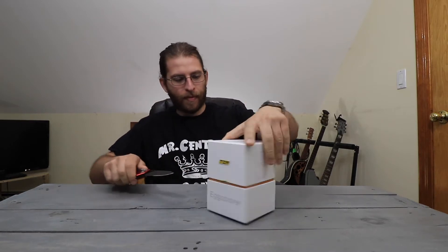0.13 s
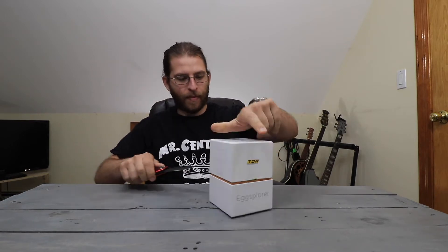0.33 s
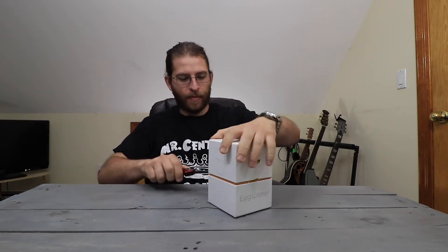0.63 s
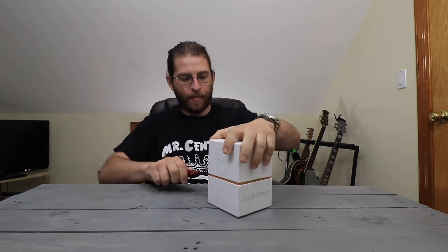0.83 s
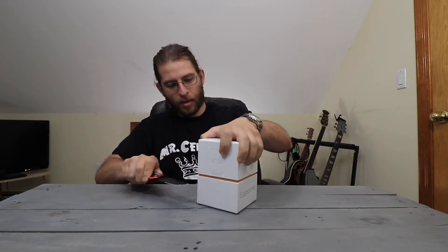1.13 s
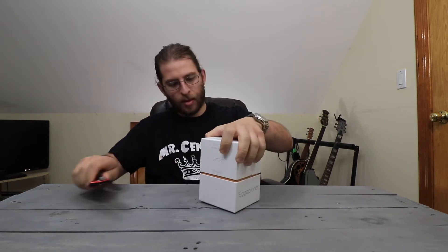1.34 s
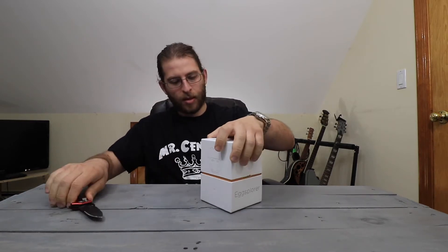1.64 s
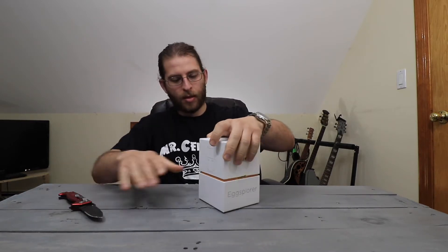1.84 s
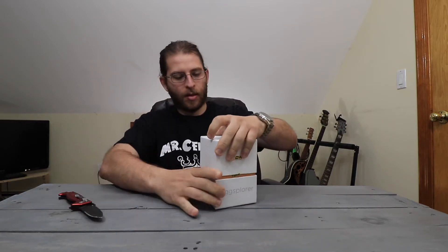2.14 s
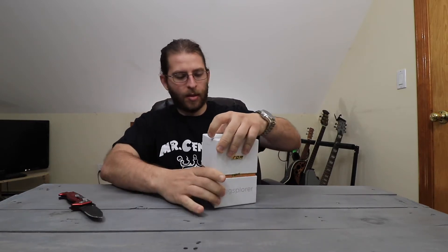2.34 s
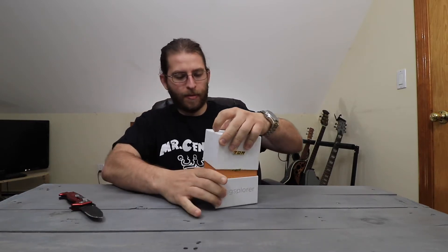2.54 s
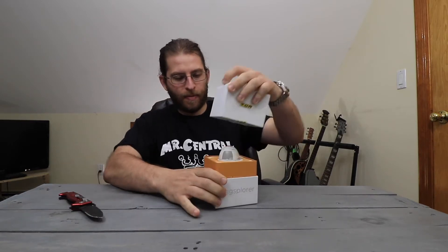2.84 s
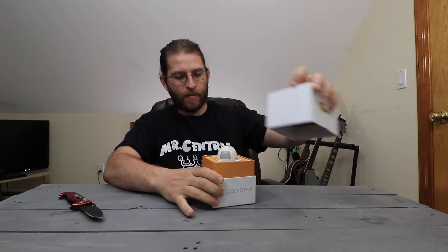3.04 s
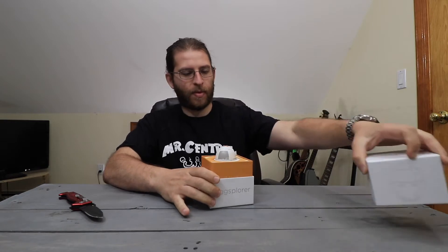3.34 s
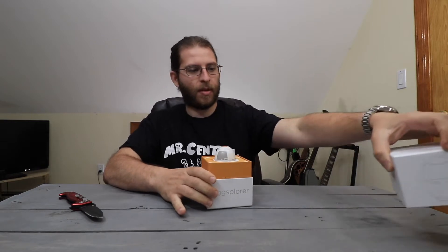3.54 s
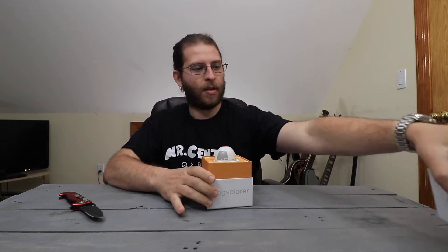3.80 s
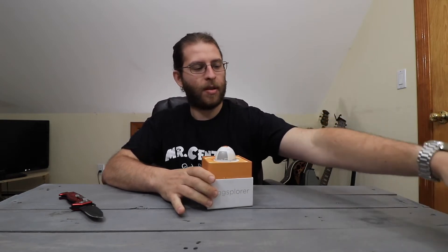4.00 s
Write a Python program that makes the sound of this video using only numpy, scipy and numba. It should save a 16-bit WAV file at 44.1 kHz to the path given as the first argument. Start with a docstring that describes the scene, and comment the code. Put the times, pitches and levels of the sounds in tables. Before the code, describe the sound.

A cardboard box is turned and knocked on a wooden table, a knife clatters down, and the lid slides off with a quick airy whistle.

```python
"""Box opened with a knife

A cardboard box is turned, slit with a knife and opened on a wooden table in a small room; the knife is dropped.
Knocks are damped box tones plus a broad slap, and ring the table modes; ticks are band-limited noise bursts.
The knife is noise contacts through resonances; sliding card is uneven noise in a moving band.
The lid whistles as noise in two climbing resonances. Room tail, rumble and hiss lie below; gain control ducks."""
import sys
import numpy as np
from scipy import signal
from scipy.fft import rfft, irfft
from scipy.io import wavfile
from scipy.ndimage import uniform_filter1d
from numba import njit

SR = 44100
rng = np.random.default_rng(int(sys.argv[2]) if len(sys.argv) > 2 else 0)


def put_to_file(sound):
    """Save the sound as 16-bit audio at rate SR, in the file named by the first command-line argument."""
    columns = np.atleast_2d(sound).T  # one column per channel
    safe = np.clip(columns, -1, 1)
    whole_steps = np.round(safe * 32767)
    wavfile.write(sys.argv[1], SR, whole_steps.astype(np.int16))


N = 183806
TIME_S = np.arange(N) / SR

# knocks on box and table: t/s, level/dB, box f/Hz, slap centre f/Hz, table ring re knock/dB
KNOCK_EVENTS = [(0.091, -7.5, 475, 350, -30), (0.228, -19.5, 366, 247, -22), (0.331, -24.5, 457, 145, -31),
                (0.35, -11.5, 450, 350, -21.5), (0.364, -10.5, 490, 282, -39.5),
                (0.382, -17.5, 437, 171, -20.5), (0.412, -27, 510, 266, -20), (0.446, -21.5, 602, 337, -36),
                (0.469, -25.5, 193, 161, -23), (0.828, -13.5, 530, 480, -33), (1.033, -5.5, 566, 417, -23),
                (1.481, -27, 465, 146, -22.5), (1.639, -16.5, 570, 363, -30), (1.657, 6, 590, 390, -19.5),
                (1.684, 5, 683, 378, -24), (2.085, -34.5, 550, 400, -29), (2.122, -34, 485, 144, -24),
                (2.167, -21, 543, 185, -19.5), (2.316, -11.5, 434, 405, -21),
                (2.382, -29.5, 169, 152.5, -21), (2.57, -3.5, 374, 346, -22.5),
                (2.733, -11, 464, 273, -28.5), (2.76, -4.5, 534, 324, -34.5), (2.767, -1, 629, 342, -43.5),
                (2.802, -24, 518, 357, -26), (4.087, 6, 398.3, 400, -22.5), (4.1, 3, 422, 401, -23),
                (4.109, 1, 658, 340, -24)]
# ticks of seals, nails and card edges: t/s, peak/dB, centre f/Hz, width/centre (ratio)
TICK_EVENTS = [(0.0923, -26.5, 1910, 2), (0.1595, -37.5, 3750, 2.4), (0.225, -32, 3530, 1.3),
               (0.2384, -23.5, 3770, 3.4), (0.3396, -15, 3200, 1.34), (0.398, -22, 2100, 5.1),
               (0.4485, -21, 3600, 1.26), (0.77, -37, 4940, 2.3), (0.999, -43, 3880, 1.3),
               (1.036, -4, 3260, 5.1), (1.482, -33.5, 1810, 0.61), (2.0087, -34.5, 3480, 3.1),
               (2.1085, -19, 10800, 1.2), (2.168, -31.5, 1820, 0.9), (2.2134, -19, 6200, 0.39),
               (2.2194, -17, 6240, 0.33), (2.2228, -16, 9400, 1.1), (2.2284, -9.5, 13100, 0.83),
               (2.2374, -16.5, 7960, 0.49), (2.26, -23, 5830, 0.47), (2.3066, -7.5, 10700, 0.64),
               (2.5577, -24, 10030, 3.6), (2.5643, -20.5, 9770, 1), (2.5707, -1, 9400, 4.1),
               (2.7391, -14, 3380, 2.9), (2.7593, -13.5, 2970, 0.57), (2.8035, -46, 3350, 1.3),
               (2.8373, -28, 3600, 2.7), (3.7994, -36, 3130, 1.1), (3.8338, -38, 3560, 2.7),
               (3.8515, -37, 6450, 1.1), (4.0853, -17, 1870, 1.6), (4.0963, -8.5, 1980, 1.6),
               (4.1084, -2.5, 1810, 1.46)]
# knife landing and bouncing: t/s, peak/dB
KNIFE_HITS = [(1.64, -11), (1.6576, 14.5), (1.6851, 20.5)]
# knife resonances: f/Hz, width/Hz, relative level/dB
KNIFE_MODES = [(1130, 500, -4), (1950, 800, 0), (2700, 900, -5), (3400, 900, -2), (4200, 1000, -3),
               (5200, 1400, -9), (7000, 2500, -13), (10400, 2500, -14)]
# table top modes: f/Hz, relative level/dB, t60/s
TABLE_MODES = [(173.3, -6.5, 0.76), (224, -16, 0.14), (267.5, 6, 0.18), (311, -10, 0.2), (360, -6, 0.68),
               (376, -34, 0.1), (483, -7, 0.082), (497, -13, 0.5), (542, 10.5, 0.079), (600, 0, 0.076),
               (660, 17, 0.081), (660, 18, 0.2), (743, -6.5, 0.056), (827, -22, 0.22), (899, -8, 0.24),
               (1070, -16, .12)]
# strokes of hand and card: start t/s, rise/s, hold/s, level/dB, centre f/Hz, glide/(octave/s),
# broad rustle re centre band/dB
SLIDE_STROKES = [(0.0, 0.00061, 0.0008, -30.5, 2980, -5, -4.5), (0.087, 0.0018, 0.07, -49, 4000, 20, 7),
                 (0.166, 0.072, 0.0076, -30, 5430, 3.5, -13.5),
                 (0.262, 0.023, 0.18, -40.5, 4760, -0.5, -3.5),
                 (0.664, 0.019, 0.044, -50.5, 8800, -4, -6.5), (0.759, 0.015, 0.065, -49, 5840, -11, -1.5),
                 (0.955, 0.058, 0.053, -51.5, 4800, 10, -0.5), (1.045, 0.002, 0.059, -35, 4400, -9, 12),
                 (1.296, 0.06, 0.055, -66, 4730, 1, -5), (1.48, 0.002, 0.002, -45, 3600, -1, -3),
                 (1.989, 0.002, 0.091, -54, 4000, 3, 16), (2.058, 0.028, 0.098, -52.5, 9500, -5, -4),
                 (2.169, 0.002, 0.004, -39.5, 7600, 2, 11), (2.177, 0.047, 0.014, -30.5, 9700, 1, -19.5),
                 (2.31, 0.0032, 0.005, -39, 5200, 0, 27), (2.351, 0.031, 0.053, -46.5, 5000, 10, 2),
                 (2.58, 0.002, 0.03, -45, 7500, 3, 16), (2.588, 0.036, 0.12, -37, 8000, 3, -4.5),
                 (2.728, 0.0023, 0.031, -35.5, 3500, -3, 13), (2.74, 0.016, 0.001, -28.5, 3100, 4, -13),
                 (2.784, 0.01, 0.028, -63, 3500, -2, 5), (2.93, 0.04, 0.15, -58.5, 3960, -13, 5),
                 (3.361, 0.03, 0.2, -55.5, 3550, -1, -0.5)]
# low rumble of table and stand: t/s, level/dB
RUMBLE_LEVEL = [(0.0, -44), (0.13, -36.5), (0.67, -43.5), (1.26, -49), (1.89, -39.5), (2.05, -48),
                (2.22, -40.5), (2.56, -36.5), (2.84, -34), (2.92, -49.5), (3.4, -46), (3.6, -53),
                (4.01, -51.5), (4.17, -34)]
# spectrum of room and microphone hiss: f/Hz, relative density/dB per Hz
HISS_SPECTRUM = [(41, -22), (70, -12.5), (126, -3), (148, -8), (190, -14.5), (256, -13.5), (286, -18),
                 (529, -19.5), (593, -14), (779, -29), (834, -32), (2600, -35.5), (16000, -37.5)]
# room tail bands: centre f/Hz, t60/s, relative level/dB
ROOM_BANDS = [(129, 0.25, -26), (522, 0.34, -14.5), (1290, 0.15, -7.5), (3300, 0.21, -16.5),
              (8100, 0.13, -14), (14000, 0.094, -44)]

BOX_T60_S, BOX_OVERTONE_RATIO, BOX_OVERTONE_DB = 0.023, 1.892, -17.5  # second wall mode re first
SLAP_WIDTH_RATIO = 0.84
# the broad slap counts for less in a hard knock
SOFT_KNOCK_DB, HARD_KNOCK_DB = -20.5, -1
SOFT_SLAP_DB, HARD_SLAP_DB = 3.5, -3
SPOT_SPREAD_DB = 3.5  # mode strength from blow to blow
TABLE_TO_ROOM_DB = 22.5
TICK_T60_AT_1KHZ_S, TICK_SHORTENING_POWER = 0.028, 0.66
KNIFE_CONTACT_T60_S = .004
STROKE_RISE_DB, STROKE_FALL_DB_PER_S = 22.5, 456
STROKE_SAG_DB_PER_S = 18  # the hand eases off during the hold
DRAG_DB = -0.5
WHISTLE_START_S, WHISTLE_PEAK_S, WHISTLE_STOP_S = 2.592, 2.65, 2.697
WHISTLE_START_HZ, WHISTLE_HZ_PER_S = 7530, 34600  # lower resonance
WHISTLE_UPPER_RATIO, WHISTLE_WIDTH_RATIO = 1.22, 0.095
WHISTLE_WAVER_RATIO = 0.045  # the lid rises in jerks
WHISTLE_DB, WHISTLE_ENDS_DB, WHISTLE_EDGE_DB_PER_S = -24.5, -12.5, 1300  # ends re peak
HISS_DB = -47
PORT_HZ, PORT_WIDTH_RATIO, PORT_DB = 3600, .22, -4  # microphone port resonance
HOLD_DB, RATIO, ATTACK_S, RELEASE_S = -15, 4, 0.0068, 0.035
TOP_HZ = 16000


def undb(db):
    """dB to amplitude."""
    return 10 ** (np.asarray(db) / 20)


def unit(x):
    """Scale to RMS 1."""
    return x / np.sqrt(np.mean(x ** 2))


def fade(t60_s, size):
    """Exponential decay, -60 dB at t60."""
    return np.exp(-np.log(1000) * np.arange(size) / SR / t60_s)


def add(out, start_s, piece):
    """Mix a piece in at its start, cut at the end of the scene."""
    i = int(start_s * SR)
    out[i:i + len(piece)] += piece[:N - i]


@njit
def svf(x, hz, width_ratio):
    """State-variable band-pass with moving centre, gain 1 there; width is a share of the centre."""
    y, b, l = np.empty(len(x)), 0., 0.
    for i in range(len(x)):
        g = np.tan(np.pi * hz[i] / SR)
        v = (b + g * (x[i] - l)) / (1 + g * (g + width_ratio))
        b, l, y[i] = 2 * v - b, l + 2 * g * v, width_ratio * v
    return y


def band(x, hz, width_ratio):
    """Band-pass at a fixed or moving centre, kept in the stable range."""
    return svf(x, np.clip(hz * np.ones(len(x)), 20, .4 * SR), max(1. * width_ratio, .01))


def band_twice(x, hz, width_ratio):
    """Two equal band-passes in series: steeper skirts."""
    return band(band(x, hz, width_ratio), hz, width_ratio)


@njit
def follow(x, attack, release):
    """Envelope that rises at one speed and falls at another."""
    y, e = np.empty(len(x)), 0.
    for i in range(len(x)):
        e += (abs(x[i]) - e) * (attack if abs(x[i]) > e else release)
        y[i] = e
    return y


def walk(rate_hz):
    """Random levels held 1 / rate and slewed twice; spread near 1."""
    k = int(SR / rate_hz)
    steps = np.repeat(rng.standard_normal(N // k + 1), k)
    return 1.5 * uniform_filter1d(uniform_filter1d(steps, k), k)[:N]


def knocks():
    """Hollow thumps: a few cycles of the box and a broad low slap, which also push table and room."""
    out, to_room, t = np.zeros(N), np.zeros(N), TIME_S[:6000]
    modes = table_modes(size=16000)
    contact = np.exp(-((t - .002) / .0003) ** 2)  # palm or card face pushes for under a millisecond
    rise = 1 - np.exp(-(t / .003) ** 2)  # soft card takes a few ms to load
    spots = rng.standard_normal((len(KNOCK_EVENTS), len(TABLE_MODES)))
    for (start_s, db, hz, slap_hz, ring_db), spot in zip(KNOCK_EVENTS, spots):
        slap_db = np.interp(db, [SOFT_KNOCK_DB, HARD_KNOCK_DB], [SOFT_SLAP_DB, HARD_SLAP_DB])
        slap = band(band(contact, slap_hz, SLAP_WIDTH_RATIO), slap_hz, 2 * SLAP_WIDTH_RATIO)
        slap = undb(slap_db) * slap / np.abs(slap).max()
        overtone = undb(BOX_OVERTONE_DB) * np.sin(2 * np.pi * BOX_OVERTONE_RATIO * hz * t)
        box = 2 * (np.sin(2 * np.pi * hz * t) + overtone) * fade(BOX_T60_S, len(t)) * rise
        thump = undb(db) * (box + slap)
        add(out, start_s, thump)
        add(out, start_s, undb(ring_db) * table(thump, modes, spot))
        # the more a blow couples to the table, the more it fills the room
        add(to_room, start_s, undb(ring_db + TABLE_TO_ROOM_DB) * thump)
    return out, to_room


def table(push, modes, spot):
    """Each blow lands on another spot, so it wakes the modes in other shares and signs."""
    ring = (np.sign(spot) * undb(SPOT_SPREAD_DB * np.abs(spot))) @ modes
    return signal.fftconvolve(push, ring / np.sqrt(np.sum(ring ** 2)))


def table_modes(size):
    """One decaying sine a row, for each mode of the table top."""
    t = TIME_S[:size]
    return np.array([undb(db) * fade(t60_s, size) * np.sin(2 * np.pi * hz * t)
                     for hz, db, t60_s in TABLE_MODES])


def ticks():
    """Each tick is a tiny burst of noise in one steep band; high ticks die faster."""
    out = np.zeros(N)
    noises = rng.standard_normal((len(TICK_EVENTS), 2000))
    for (start_s, db, hz, width_ratio), noise in zip(TICK_EVENTS, noises):
        t60_s = TICK_T60_AT_1KHZ_S * (hz / 1000) ** -TICK_SHORTENING_POWER
        burst = band_twice(noise * fade(t60_s, len(noise)), hz, width_ratio)
        add(out, start_s, undb(db) * burst / np.abs(burst).max())
    return out


def knife():
    """Hard rattling contacts excite the damped handle and blade."""
    out = np.zeros(N)
    for (start_s, db), noise in zip(KNIFE_HITS, rng.standard_normal((len(KNIFE_HITS), 6000))):
        contact = noise * fade(KNIFE_CONTACT_T60_S, len(noise))
        ring = sum(undb(mode_db) * unit(band(contact, hz, width_hz / hz))
                   for hz, width_hz, mode_db in KNIFE_MODES)
        add(out, start_s, undb(db) * ring / np.abs(ring).max())
    return out


def slides():
    """Dense uneven fibre catches in a moving band over a broad rustle; the drag rumbles in the box."""
    start_s, rise_s, hold_s, db, centre_hz, glide, broad_db = np.transpose(SLIDE_STROKES)
    levels_db = np.array([stroke(*times) for times in zip(start_s, rise_s, hold_s)]) + db[:, None]
    loudest = levels_db.argmax(axis=0)  # the loudest stroke sets level and colour
    octaves = np.clip(glide[loudest] * (TIME_S - start_s[loudest]), -1, 1)
    hz = uniform_filter1d(centre_hz[loudest] * 2 ** octaves, 400)
    broad = uniform_filter1d(undb(broad_db)[loudest], 400)
    gain = uniform_filter1d(undb(levels_db.max(axis=0)), 200) * undb(2.2 * walk(140))
    fibres = rng.standard_normal(N) * undb(3.23 * rng.exponential(size=N))
    catches = unit(band_twice(fibres, hz, 2.06))
    rustle = unit(band(rng.standard_normal(N), 3900, 2.3))
    drag = unit(band_twice(rng.standard_normal(N), 422, 0.85)) * undb(DRAG_DB + walk(60))
    return gain * (catches + broad * (rustle + drag)) / np.sqrt(1 + broad ** 2)


def stroke(start_s, rise_s, hold_s):
    """Envelope in dB: climb, hold with a slight sag, then fall steadily."""
    top_s = start_s + max(rise_s, 1 / SR)
    climb = STROKE_RISE_DB * np.minimum(TIME_S - top_s, 0) / (top_s - start_s)
    sag = STROKE_SAG_DB_PER_S * np.clip(TIME_S - top_s, 0, hold_s)
    fall = STROKE_FALL_DB_PER_S * np.maximum(TIME_S - top_s - hold_s, 0)
    return climb - sag - fall


def whistle():
    """Air in the gap of the rising lid: noise in two narrow resonances that climb as it opens."""
    swell_db = np.interp(TIME_S, [WHISTLE_START_S, WHISTLE_PEAK_S, WHISTLE_STOP_S],
                         [WHISTLE_ENDS_DB, 0, WHISTLE_ENDS_DB])
    outside_s = np.maximum(WHISTLE_START_S - TIME_S, 0) + np.maximum(TIME_S - WHISTLE_STOP_S, 0)
    gain = undb(WHISTLE_DB + swell_db - WHISTLE_EDGE_DB_PER_S * outside_s + 1.1 * walk(170))
    climb_hz = WHISTLE_START_HZ + WHISTLE_HZ_PER_S * (TIME_S - WHISTLE_START_S)
    climb_hz = np.clip(climb_hz, WHISTLE_START_HZ, 2 * WHISTLE_START_HZ)
    hz = climb_hz * (1 + WHISTLE_WAVER_RATIO * walk(39.94))
    return gain * sum(unit(band(rng.standard_normal(N), hz * k, WHISTLE_WIDTH_RATIO))
                      for k in (1, WHISTLE_UPPER_RATIO))


def room(x):
    """Reverberation: decaying noise, band by band, after a short gap."""
    size = SR // 2
    tail = sum(undb(db) * unit(band_twice(rng.standard_normal(size), hz, 1.35)) * fade(t60_s, size)
               for hz, t60_s, db in ROOM_BANDS)
    onset = 1 - np.exp(-(TIME_S[:size] / 0.00067) ** 2)
    return signal.fftconvolve(x, tail * onset * undb(-27.5))[:N]


def shake():
    """Slow wobble of table and stand: low band noise under a level curve."""
    t_s, db = np.transpose(RUMBLE_LEVEL)
    rumble = band(band(rng.standard_normal(N), 51.5, 0.3), 39.0, 1.0)
    return undb(np.interp(TIME_S, t_s, db)) * unit(rumble)


def air():
    """Steady coloured hiss, the lower bands wavering a little."""
    hz = np.arange(1, N // 2 + 2) * SR / N
    point_hz, point_db = np.transpose(HISS_SPECTRUM)
    colour = undb(np.interp(np.log(hz), np.log(point_hz), point_db))
    hiss = irfft(rfft(rng.standard_normal(N)) * colour, N)
    low = band(hiss, 290, 3.1)
    return undb(HISS_DB) * unit(hiss + low * (undb(2.5 * walk(9)) - 1))


def scene():
    """Sum of direct sources, room tail, rumble and hiss."""
    thumps, to_room = knocks()
    near = ticks() + knife() + slides() + whistle()
    return (near + thumps + room(near + to_room) + shake() + air())[None]


def record(dry):
    """Port lifts one band; gain control ducks after loud hits, recovers fast; peaks clip; top is cut."""
    mic = dry[0] + undb(PORT_DB) * band(dry[0], PORT_HZ, PORT_WIDTH_RATIO)
    env = follow(mic, 1 / (ATTACK_S * SR), 1 / (RELEASE_S * SR))
    held = mic * np.maximum(env / undb(HOLD_DB), 1) ** (1 / RATIO - 1)
    low_pass = signal.ellip(12, .2, 85, TOP_HZ, fs=SR, output="sos")
    return signal.sosfilt(low_pass, np.clip(held, -.97, .97))[None]


dry = scene()
out = record(dry)
put_to_file(out)
```